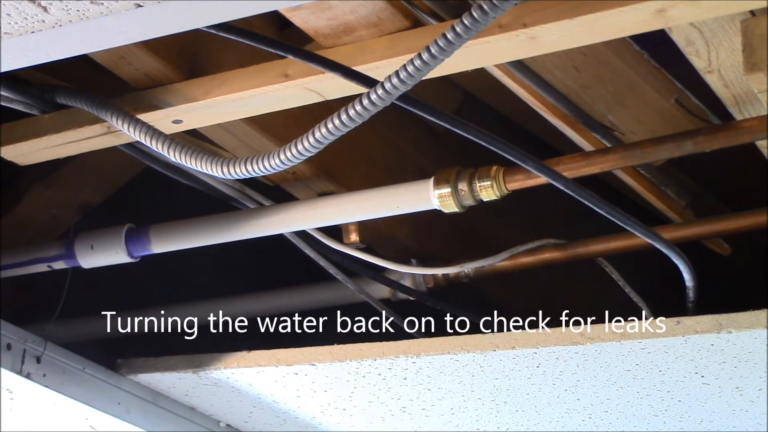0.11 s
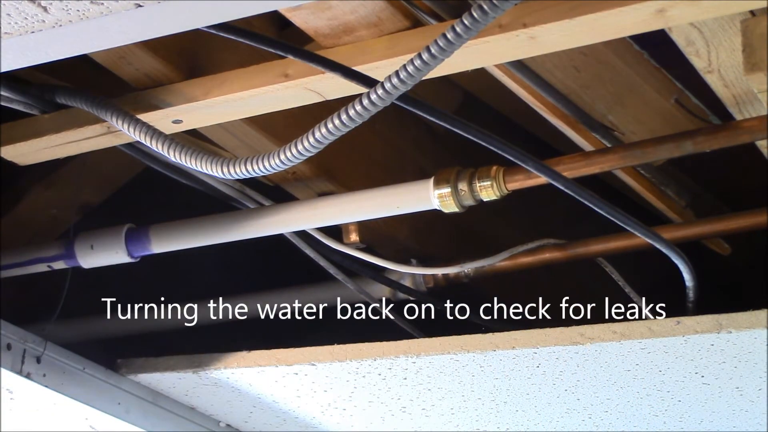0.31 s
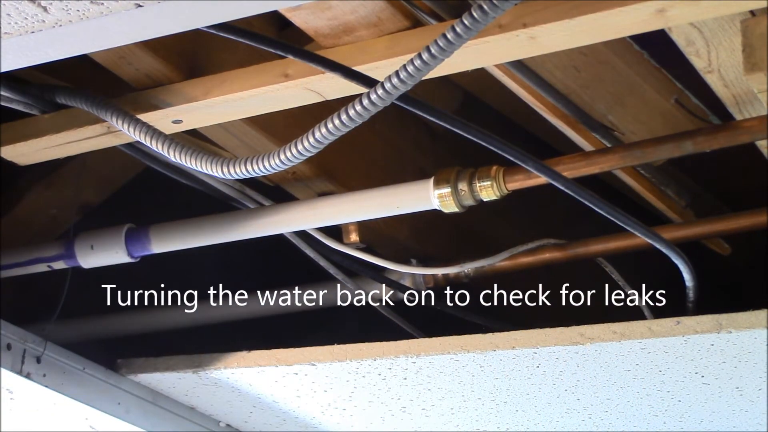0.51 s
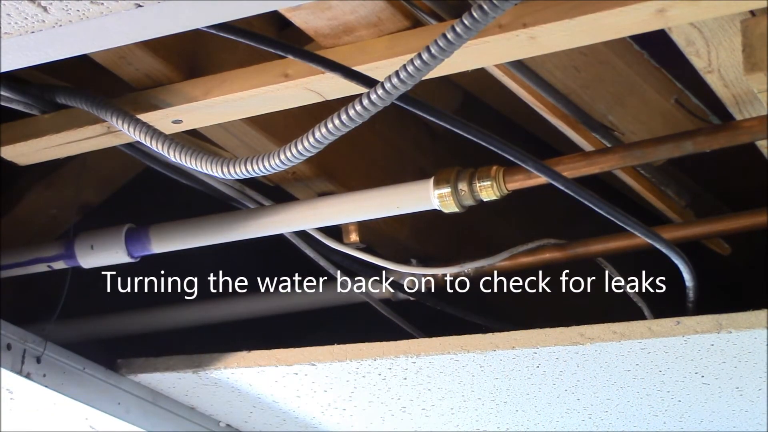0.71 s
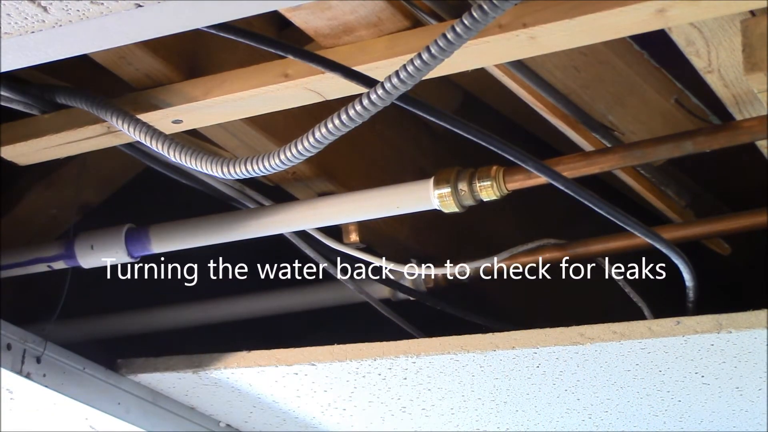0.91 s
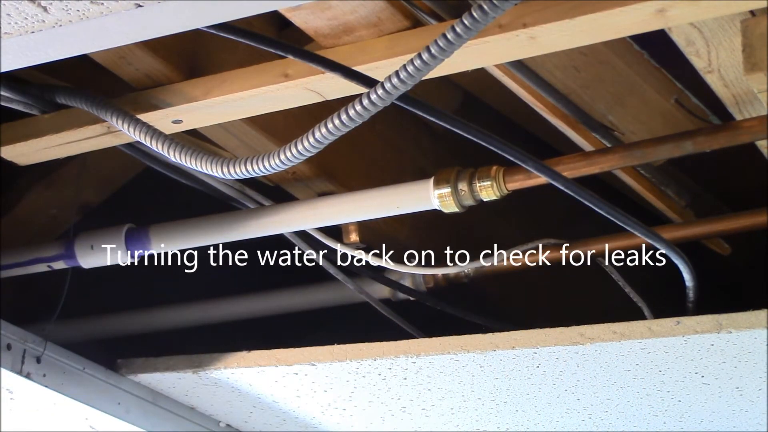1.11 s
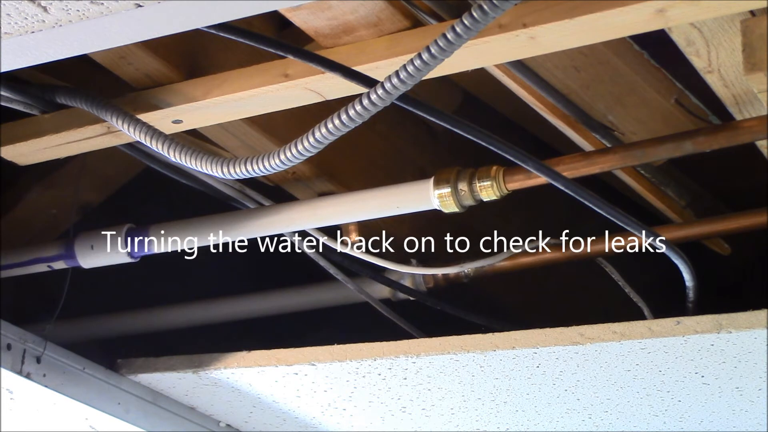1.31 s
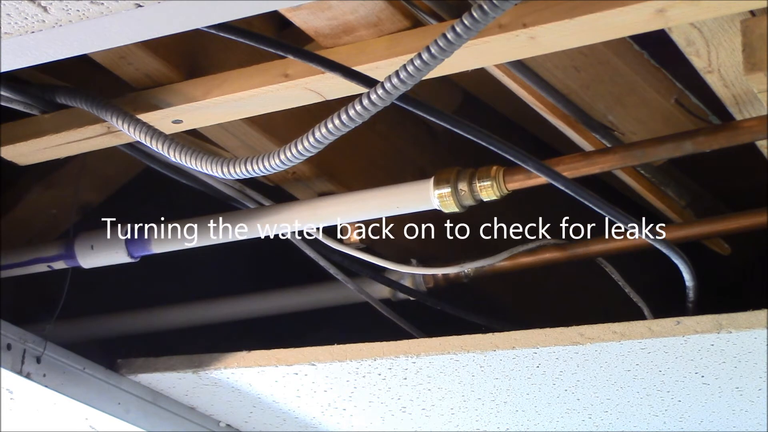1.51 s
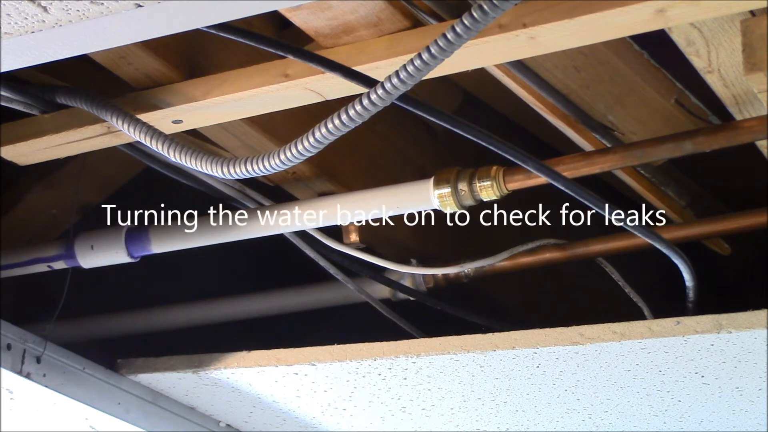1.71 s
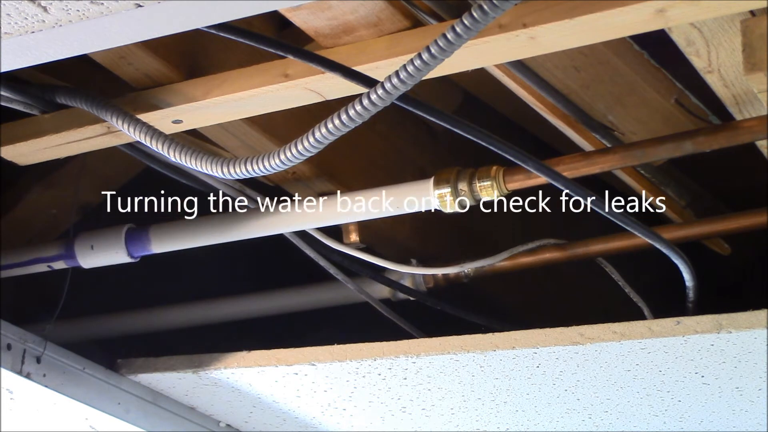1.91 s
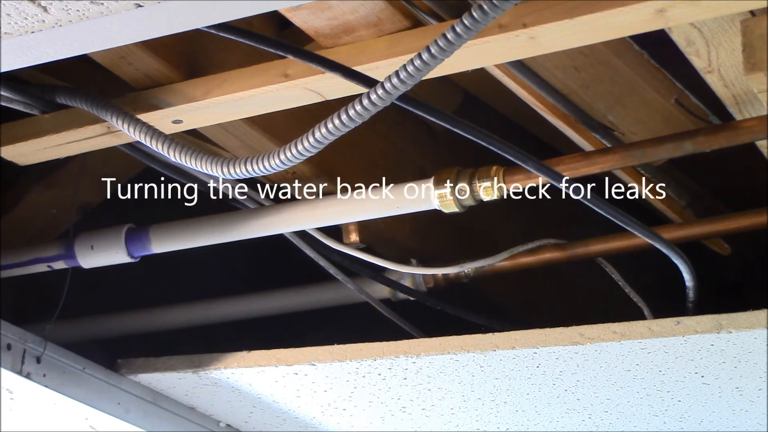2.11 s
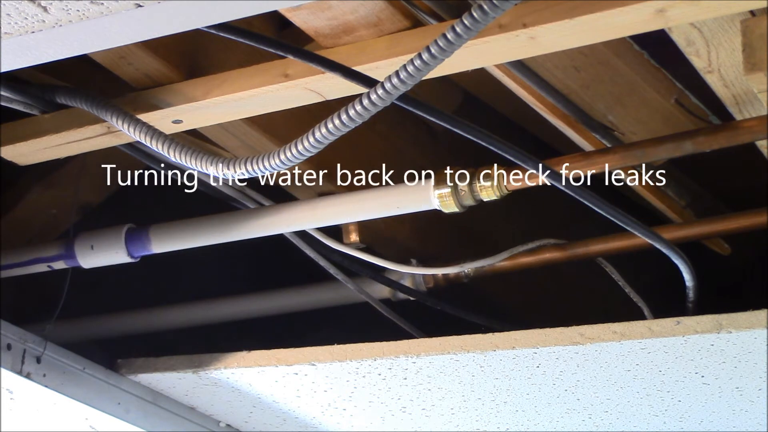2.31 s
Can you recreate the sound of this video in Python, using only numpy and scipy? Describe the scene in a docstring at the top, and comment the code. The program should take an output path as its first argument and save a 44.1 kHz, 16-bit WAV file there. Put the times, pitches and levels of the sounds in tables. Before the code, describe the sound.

Air pockets spit and knock sharply in a refilling water pipe, strongest around one second, then sparser and weaker, ending in a short bubbly gurgle; thin hiss and faint motor whir, close in a basement.

```python
"""A thin hiss of water and a motor's whir come first, under a basement ceiling as pipes refill.
Then pockets of trapped air spit and knock in an uneven run: bursts of tiny collapses ring the pipe.
A short gurgle of swelling sine bubbles ends the run while the hiss fades.
Hiss and room air are coloured noise; the motor is a set of slightly wavering tones."""
import sys
import numpy as np
from scipy import signal
from scipy.fft import rfft, irfft
from scipy.io import wavfile

SR = 44100
rng = np.random.default_rng(int(sys.argv[2]) if len(sys.argv) > 2 else 0)


def int16_out(signal):
    """Quantize to a 16-bit WAV file."""
    q = np.round(np.clip(np.atleast_2d(signal).T, -1, 1) * 32767)
    wavfile.write(sys.argv[1], SR, q.astype(np.int16))


N = 105840  # 2.4 s


def from_db(db):
    """Decibels to amplitude gain."""
    return 10 ** (np.asarray(db) / 20)


def rms_one(x):
    """Scale to unit power."""
    return x / np.sqrt(np.mean(x ** 2) + 1e-20)


def bins(size):
    """Frequencies in Hz of a transform of this size, kept at 1 Hz or more for the logarithms."""
    return np.maximum(np.arange(size // 2 + 1) * SR / size, 1)


def at_hz(points, hz):
    """Read a frequency table on a log-frequency axis."""
    f, value = np.transpose(points)
    return np.interp(np.log(hz), np.log(f), value)


def colour(x, db):
    """Causal (minimum-phase) filter with the given gain per frequency, by folding the cepstrum."""
    size = x.shape[-1]
    cepstrum = irfft(np.log(from_db(db)), size)
    cepstrum[1:size // 2] *= 2
    cepstrum[size // 2 + 1:] = 0
    response = np.exp(rfft(cepstrum))
    return irfft(rfft(x) * response, size)


def fade(t, t60):
    """Exponential decay, 60 dB in t60 seconds."""
    return np.exp(-np.log(1000) * t / t60)


def slow_noise(shape, corner_hz):
    """Random drift for modulation: noise whose gain has halved at the corner."""
    gain = 1 / (1 + (bins(N) / corner_hz) ** 2)
    return rms_one(irfft(rfft(rng.standard_normal(shape)) * gain, N))


def stereo(pair, width):
    """Two unrelated signals as mid and side, to left and right."""
    mid = pair[0]
    side = colour(pair[1], at_hz(width, bins(pair.shape[-1])))
    return np.array([mid + side, mid - side])


# stereo width of room air and hiss: freq_hz [Hz], side_minus_mid_db [dB]
NOISE_WIDTH = [(30, -10), (110, 0.5), (250, -2.5), (600, -13), (1500, -9.5), (4000, -6.5), (12000, -8.5)]


def noise(spectrum):
    """Steady stereo noise of a given colour."""
    pair = colour(rng.standard_normal((2, N)), at_hz(spectrum, bins(N)))
    return stereo(rms_one(pair), NOISE_WIDTH)


# colour of the room air: freq_hz [Hz], relative_db [dB]
AIR_COLOUR = [(15, -70), (25, -31.5), (223, -27.5), (317, -20), (463, -12), (516, -12), (560, -4),
              (734, -9.5), (840, -4), (988, -8.5), (1070, -3), (1370, -7.5), (1790, -9), (2610, -11.5),
              (4490, -16.5), (7710, -21), (9070, -25), (14800, -25), (16000, -25)]
AIR_DB = -56
# motor tones: pitch_hz [Hz], level_db [dB]
MOTOR_TONES = [(212, -94), (236, -87.5), (424, -73.5), (469, -68), (583, -76), (703, -71.5), (849, -65),
               (1061, -68), (1172, -70), (1408, -65), (1545, -68.5), (2449, -74), (7978, -82), (14540, -78),
               (14565, -91)]
WAVER_HZ, WAVER_DEPTH = 4.2, 0.45  # half-gain corner; rms depth as a share of each tone


def motor():
    """Steady rush of air with tones that waver slightly in strength and phase."""
    t = np.arange(N) / SR
    tones = 0
    for pitch_hz, level_db in MOTOR_TONES:
        in_step, across = WAVER_DEPTH * slow_noise((2, N), WAVER_HZ)
        phase = 2 * np.pi * (pitch_hz * t + rng.random())
        wavering = (1 + in_step) * np.cos(phase) + across * np.sin(phase)
        tones = tones + from_db(level_db) * wavering
    return tones + from_db(AIR_DB) * noise(AIR_COLOUR)


# loudness curve of the hiss, before flutter: time_s [s], level_db [dB]
FLOW_LEVEL = [(0, -61), (.09, -55.5), (.15, -58), (.18, -52), (.21, -56.5), (.27, -58.5), (.33, -62.5),
              (.39, -59), (.48, -60), (.55, -63.5), (0.679, -59.5), (.86, -68.5), (1.5, -64.5),
              (1.67, -63.5), (1.76, -65.5), (2.4, -83)]
# colour of the hiss: freq_hz [Hz], relative_db [dB]
FLOW_COLOUR = [(100, -52.5), (300, -16), (450, -3), (1100, -3), (2000, 1.5), (3000, -3.5), (4600, -5.5),
               (6000, -8), (7500, -7.5), (11000, -9.5), (16000, -19)]
# faint whistles: pitch_hz [Hz], half_width_hz [Hz, centre to 6 dB down], level_db [dB against the hiss]
FLOW_WHISTLES = [(2030, 220, -8.5), (2600, 69, -13.5), (5970, 240, -12)]
FLUTTER_DB, FLUTTER_HZ = 2, 30  # rms depth, half-gain corner


def flow():
    """Thin, fluttering hiss of water filling the line, with faint narrow-band whistles in it."""
    f = bins(N)
    whistles = 0
    for pitch_hz, half_width_hz, level_db in FLOW_WHISTLES:
        band_db = -20 * np.log10(1 + ((f - pitch_hz) / half_width_hz) ** 2)
        whistles = whistles + from_db(level_db) * rms_one(colour(rng.standard_normal(N), band_db))
    level_db = np.interp(np.arange(N) / SR, *np.transpose(FLOW_LEVEL))
    flutter_db = FLUTTER_DB * slow_noise(N, FLUTTER_HZ)
    return from_db(level_db + flutter_db) * (noise(FLOW_COLOUR) + whistles)


# single bubbles: start_s [s], pitch_hz [Hz], level_db [dB at the peak], length_s [s]
BUBBLES = [(0.161, 364, -57, 0.024), (0.344, 384, -63.5, 0.029), (1.779, 2158, -48, .015),
           (1.788, 1640, -40, 0.014), (1.805, 1911, -49, 0.027), (1.814, 1118, -39, 0.014),
           (1.827, 1338, -43.5, 0.023), (1.830, 396, -52.5, 0.012)]


def bubbles():
    """Larger bubbles each sing one brief note that swells and shrinks as half a sine."""
    t = np.arange(N) / SR
    out = np.zeros(N)
    for start_s, pitch_hz, level_db, length_s in BUBBLES:
        swell = np.sin(np.pi * np.clip((t - start_s) / length_s, 0, 1))
        out += from_db(level_db) * swell * np.sin(2 * np.pi * pitch_hz * (t - start_s))
    return out


# pipe resonances: freq_hz [Hz], width_hz [Hz, full at half power], lift_db [dB, typical; varies per spit]
PIPE_MODES = [(480, 50, 4), (770, 50, 7), (1605, 40, 6), (1775, 40, 5), (1880, 35, 5), (2080, 35, 5),
              (2340, 40, 7), (2650, 45, 4), (2905, 45, 6), (3078, 35, 5), (3328, 35, 6), (5140, 70, 4),
              (5600, 50, 4), (6760, 90, 4)]
PIPE_VARIES = 0.15  # random spread of each lift, as a share of it
PIPE_DB = -2.5  # overall gain of the pipe


def pipe_ring_db(f):
    """The pipe's resonances add up as power, each a little stronger or weaker on every spit."""
    power = 1
    for freq_hz, width_hz, lift_db in PIPE_MODES:
        lift = lift_db * (1 + PIPE_VARIES * rng.standard_normal())
        peak = from_db(abs(lift)) ** 2 - 1
        power = power + peak / (1 + (2 * (f - freq_hz) / width_hz) ** 2)
    return PIPE_DB + 10 * np.log10(power)


COLLAPSES_PER_S, COLLAPSE_SPREAD_DB = 14000, 3


def collapses(size):
    """Dense random clicks of either sign and uneven strength, one train for mid and one for side."""
    hits = rng.random((2, size)) < COLLAPSES_PER_S / SR
    signs = np.sign(rng.standard_normal((2, size)))
    strength = from_db(COLLAPSE_SPREAD_DB * rng.standard_normal((2, size)))
    return rms_one(hits * signs * strength)


# air pockets bursting through: start_s [s], rise_s [s], hold_s [s, start to decay], level_db [dB],
# body_db, edge_db, spray_db [dB against the core band], ring_a_hz, ring_b_hz [Hz]
SPITS = [(0.2175, 0.00037, 0.0056, -23, -5, -1.5, -20.5, 1500, 2740),
         (0.243, 0.0011, 0.0037, -37.5, -13, -3, -10, 1187, 2270),
         (0.4142, 0.00042, 0.0057, -25, -17, -5.5, -14, 2950, 3730),
         (0.431, 0.0013, 0.004, -36, -2, -11, -5.5, 753, 1640),
         (0.5636, 0.00055, 0.0033, -37, 4, -9, -13, 1600, 2270),
         (0.5813, 0.0024, 0.0068, -23, -4.5, -2, -7.5, 1598, 2864),
         (0.726, 0.00028, 0.0082, -23.5, -14, -8, -26.5, 2083, 3180),
         (0.739, .002, 0.015, -35.5, 1.5, -4, -14, 500, 1870),
         (0.775, 0.0093, 0.019, -35, -2, -4.5, -12, 1545, 1790),
         (0.802, 0.0013, 0.0029, -40, -29, -12, -7, 1437, 2000),
         (0.9136, 0.00042, 0.0059, -16.5, -11, -8.5, -20.5, 2335, 3300),
         (0.9242, 0.0017, .006, -18.5, -18.5, -9.5, -23, 1776, 2310),
         (0.97, 0.0034, 0.0077, -25.5, -2.5, -19, -21.5, 1318, 2080),
         (1.054, 0.0011, 0.0066, -18.5, -11, -8.5, -24.5, 1604, 2648),
         (1.2622, 0.0018, 0.0078, -29, -8.5, -9, -21, 1609, 2120),
         (1.289, 0.0014, .006, -42, -20, -10, -14, 1590, 2330),
         (1.339, .003, 0.011, -41, -5, -13, -21, 1610, 2420),
         (1.4145, 0.00032, 0.014, -33.5, -5.5, -14.5, -22, 1119, 2230),
         (1.6922, 0.00039, 0.0088, -36.5, -5, -12, -15.5, 1495, 1880),
         (1.78, 0.011, 0.056, -37.5, -0.5, -2.5, -8, 2158, 1280)]
# roll-off shared by all spits: freq_hz [Hz], gain_db [dB]
SPIT_ROLLOFF = [(60, -43), (200, -29), (310, -20), (440, -8.5), (750, -2.5), (1100, 0), (2300, 0.5),
                (3800, -0.5), (7000, 0.5), (11000, -0.5), (16000, -5.5)]
# stereo width of the spits: freq_hz [Hz], side_minus_mid_db [dB]
SPIT_WIDTH = [(400, -45), (1200, -73), (2400, -34.5), (4500, -18.5), (12000, -21.5)]
BODY_HZ, CORE_LOW_HZ, CORE_HIGH_HZ, EDGE_HZ, SPRAY_HZ = 740, 1890, 2780, 5150, 11000
SPIT_T60_S, TAIL_DB, TAIL_T60_S = 0.05, -12.5, 0.16  # burst decay, then a fainter, longer room tail
RING_DB, RING_T60_S = -12.5, 0.078  # the two ringing notes, against the spit's level
KNOCK_HZ, KNOCK_DB, KNOCK_T60_S = 785.4, -22, 0.14  # low knock of the pipe, against the spit's body


def spits(size=16384):
    """Each air pocket is a burst of collapses that rises, holds and dies, with two notes and a knock."""
    out = np.zeros((2, N + size))
    t, f = np.arange(size) / SR, bins(size)
    for start_s, rise_s, hold_s, level_db, body_db, edge_db, spray_db, ring_a_hz, ring_b_hz in SPITS:
        attack = np.minimum(t / rise_s, 1)
        after = np.maximum(t - hold_s, 0)
        tail = from_db(TAIL_DB) * fade(after, TAIL_T60_S)
        envelope = attack * np.hypot(fade(after, SPIT_T60_S), tail)

        bands = [(BODY_HZ, body_db), (CORE_LOW_HZ, 0), (CORE_HIGH_HZ, 0),
                 (EDGE_HZ, edge_db), (SPRAY_HZ, spray_db)]
        tone_db = at_hz(bands, f) + at_hz(SPIT_ROLLOFF, f)
        burst = colour(collapses(size) * envelope, tone_db + pipe_ring_db(f))
        burst = stereo(burst, SPIT_WIDTH)

        notes = np.sin(2 * np.pi * ring_a_hz * t) + np.sin(2 * np.pi * ring_b_hz * t)
        ring = from_db(RING_DB) * fade(t, RING_T60_S) * notes
        knock = np.sin(2 * np.pi * KNOCK_HZ * t) * fade(t, KNOCK_T60_S)
        knock = from_db(body_db + KNOCK_DB) * knock

        start = int(start_s * SR)
        out[:, start:start + size] += from_db(level_db) * (burst + attack * (knock + ring))
    return out[:, :N]


LOW_LAG_S, LOW_LAG_HZ = 0.006086, 1254  # delay of the deepest lows; where it has halved


def dispersed(x):
    """Low notes travel along the pipe more slowly, so they trail the sharp edge of each spit."""
    lag_s = LOW_LAG_S / (1 + (bins(N) / LOW_LAG_HZ) ** 4)
    phase = 2 * np.pi * np.cumsum(lag_s) * SR / N  # delay summed over frequency gives phase
    return irfft(rfft(x) * np.exp(-1j * phase), N)


def scene():
    """The room, the filling line, and the pipe spitting overhead."""
    return motor() + flow() + bubbles() + dispersed(spits())


def record(dry):
    """The top is cut steeply at 15.9 kHz."""
    top_cut = signal.ellip(12, .1, 70, 15900, fs=SR, output="sos")  # 0.1 dB ripple, 70 dB down above
    return signal.sosfilt(top_cut, dry)


dry = scene()
out = record(dry)
int16_out(out)
```